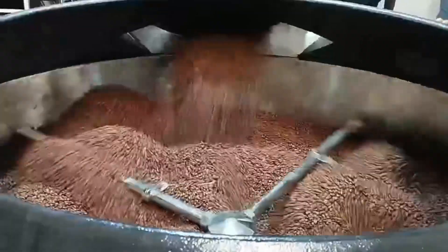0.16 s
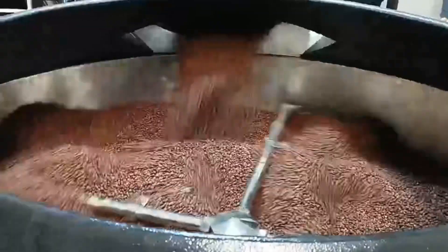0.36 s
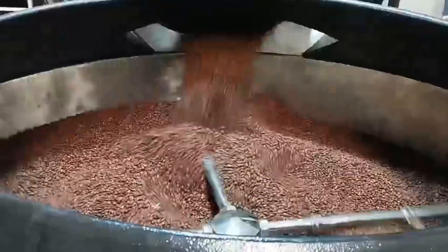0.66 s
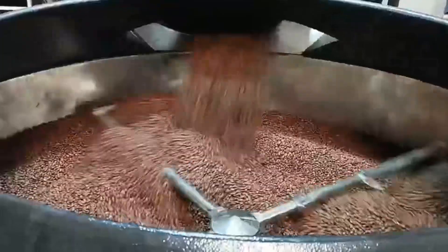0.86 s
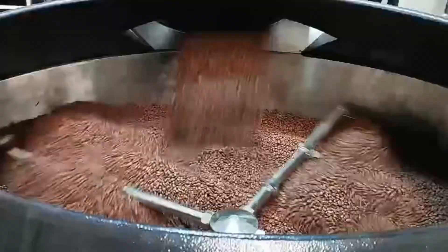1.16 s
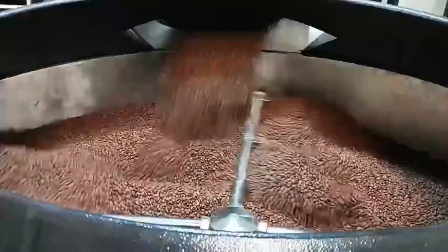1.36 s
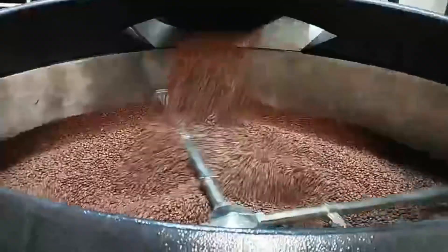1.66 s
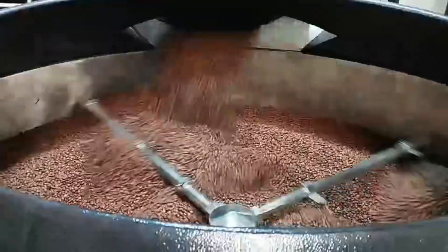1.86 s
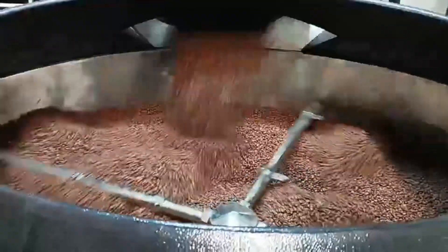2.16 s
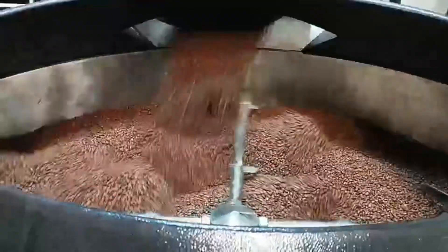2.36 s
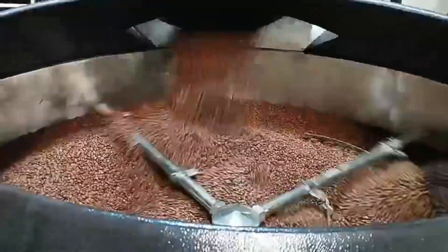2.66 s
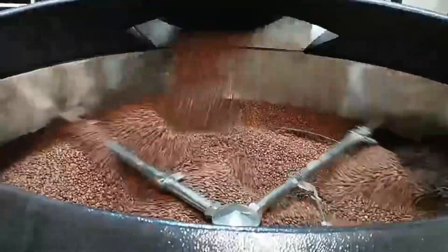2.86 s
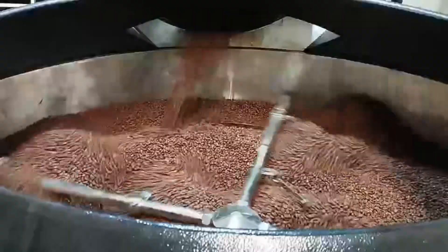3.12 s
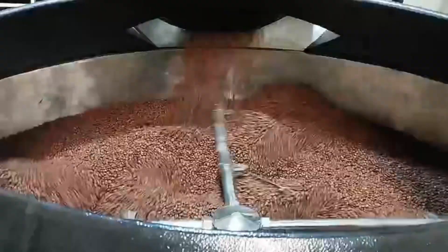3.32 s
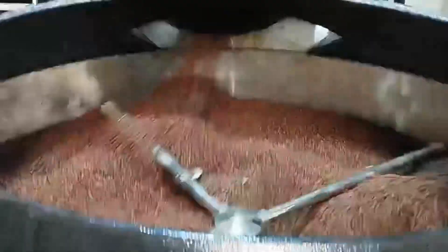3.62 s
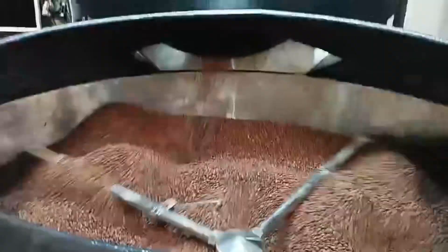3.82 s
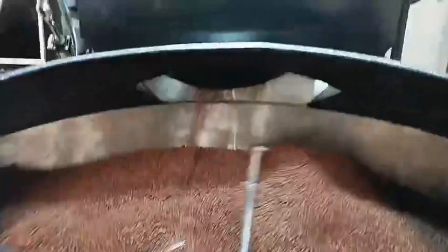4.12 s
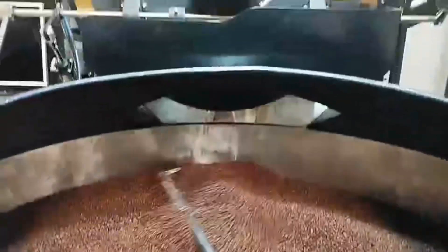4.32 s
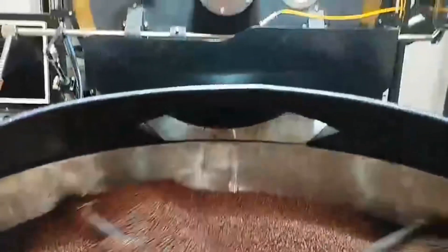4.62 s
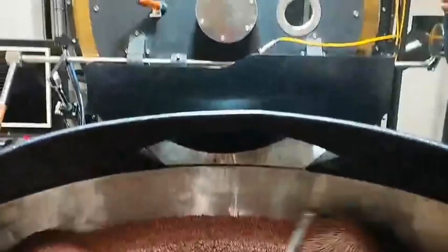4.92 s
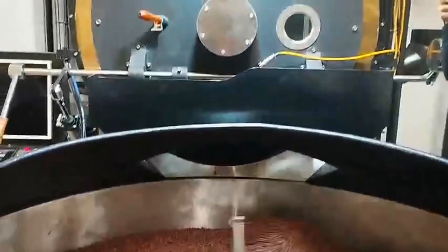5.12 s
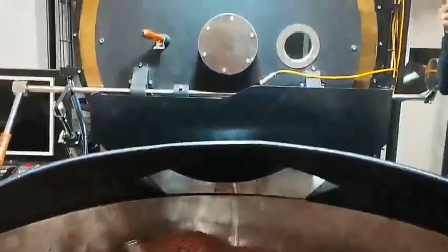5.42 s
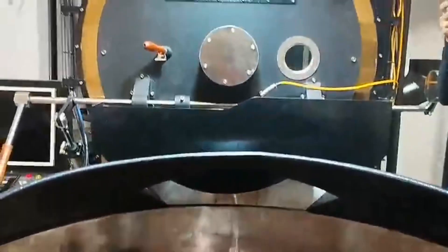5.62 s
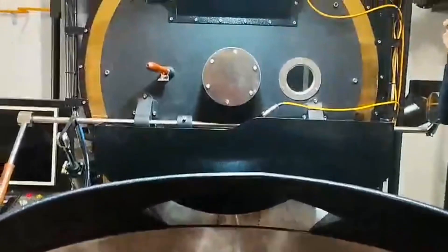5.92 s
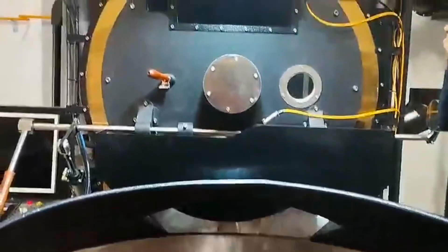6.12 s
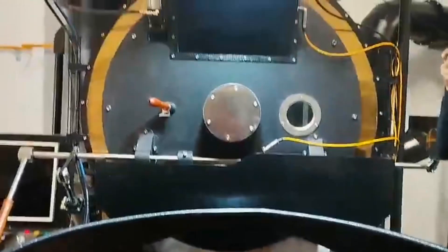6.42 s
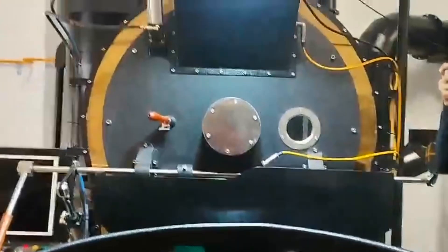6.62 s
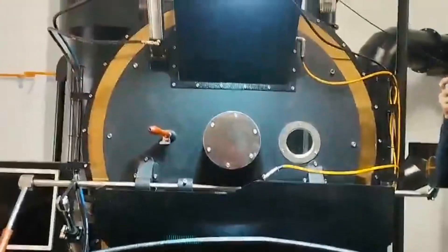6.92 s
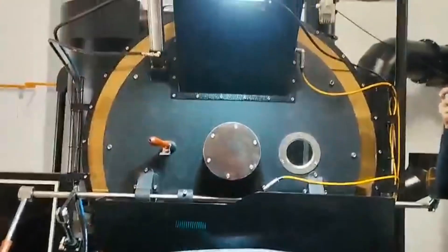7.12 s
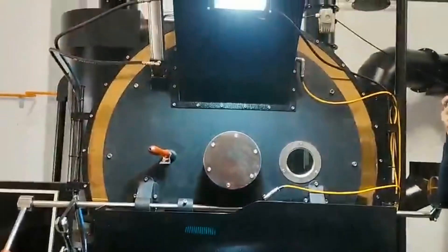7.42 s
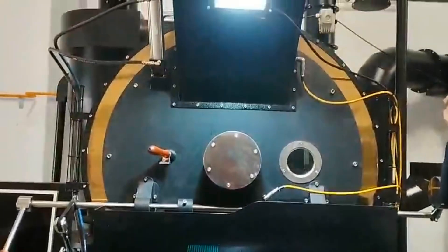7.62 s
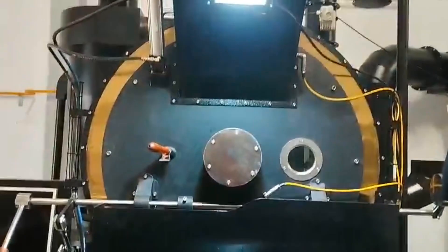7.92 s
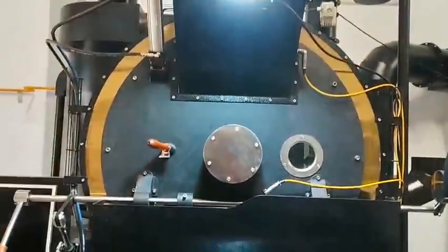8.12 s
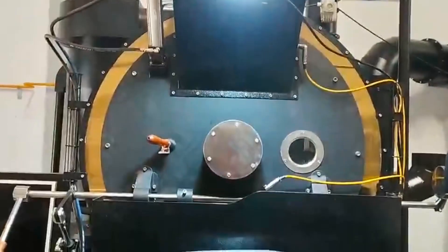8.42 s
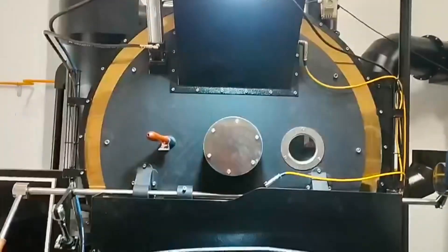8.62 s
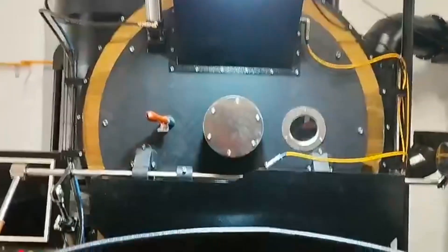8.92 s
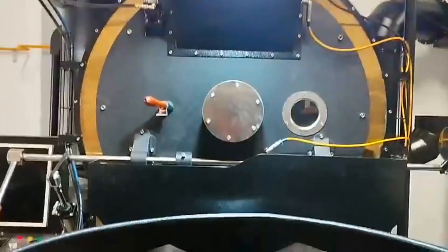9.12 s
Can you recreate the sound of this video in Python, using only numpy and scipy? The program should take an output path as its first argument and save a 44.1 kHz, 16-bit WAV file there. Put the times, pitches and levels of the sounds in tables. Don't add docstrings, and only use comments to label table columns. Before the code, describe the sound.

In a factory hall, a heavy continuous low drone surges and stalls several times a second over rumbling duct air and fan roar. Over it, countless tiny bean knocks merge into a rushing sizzle with few separate ticks, softening after about four seconds. Faint high metallic squeaks flicker around the middle. The handheld stereo phone is close, bass nearly central, treble wider, with automatic level pumping whenever the hum swells.

```python
import sys
import numpy as np
from scipy import signal
from scipy.fft import rfft, irfft
from scipy.io import wavfile
from scipy.ndimage import uniform_filter1d, minimum_filter1d

SR = 44100
rng = np.random.default_rng(int(sys.argv[2]) if len(sys.argv) > 2 else 0)


def attenuation_scalar(level_db):
    decades = np.asarray(level_db, float) / 20
    return 10 ** decades


def to_wav(sig):
    pcm = np.clip(np.atleast_2d(sig), -1, 1) * 32767
    pcm = np.round(pcm).astype(np.int16)
    wavfile.write(sys.argv[1], SR, pcm.T)


N = 408785

T = np.arange(N) / SR
SLOW_T = T[::441]
HZ = np.fft.rfftfreq(1024, 1 / SR)
FRAME_T = np.arange(N // 256 + 5) * 256 / SR


def evened(x):
    return x / np.sqrt(np.mean(x ** 2) + 1e-20)


def read(points, hz, axis=1):
    points = np.array(points)
    return np.interp(np.log(hz + 1), np.log(points[:, 0] + 1), points[:, axis])


def curve(rows, axis, t=T):
    rows = np.array(rows)
    return np.interp(t, rows[:, 0], rows[:, axis])


def bumps(rows):
    total = np.zeros(len(SLOW_T))
    for time_s, height, half_s in rows:
        total += height * np.exp(-((SLOW_T - time_s) / half_s) ** 2)
    return np.interp(T, SLOW_T, total)


def drift(hz):
    return evened(signal.lfilter(*signal.butter(2, hz, fs=SR), rng.standard_normal(N)))


# pitch_hz, likeness (1 = same, 0 = unrelated)
PORT_LIKENESS = [(60, 1.0), (110, 1), (200, 0.93), (380, 0.91), (700, 0.68), (1290, 0.1), (2380, 0.012),
                 (4400, -0.067), (8120, 0.013), (15000, 0.047)]


def pair(hz, shape):
    a, b, c, d = rng.standard_normal((4, *shape))
    left = a + 1j * b
    other = c + 1j * d
    same = np.clip(read(PORT_LIKENESS, hz), -1, 1)
    same = same.reshape(-1, *[1] * (len(shape) - 1))
    return np.array([left, same * left + np.sqrt(1 - same ** 2) * other])


def hiss(field_db, patchy_db, flicker_db):
    patches = rng.standard_normal((len(HZ), len(FRAME_T)))
    patches = uniform_filter1d(patches, size=14, axis=0)
    patches = evened(uniform_filter1d(patches, size=12, axis=1))
    flicker = evened(uniform_filter1d(rng.standard_normal(len(FRAME_T)), size=5))
    level_db = field_db + patchy_db * patches + flicker_db * flicker
    spectra = pair(HZ, patches.shape) * attenuation_scalar(level_db)
    return signal.istft(spectra, nperseg=1024, noverlap=768)[1][:, :N]


def mode(hz, level_db, wander_hz, wander_db, apart):
    phase = 2 * np.pi * np.cumsum(hz + wander_hz * drift(hz=10.05)) / SR
    lag = np.outer([1, -1], apart * drift(hz=1.6))
    return np.sqrt(2) * np.sin(phase + lag) * attenuation_scalar(level_db + wander_db * drift(hz=9.5))


# time_s, rise_db, half_length_s
FLAME_SURGES = [(0.04, 1.5, 0.045), (0.19, 5, 0.026), (0.62, -1.5, 0.042), (1.1, 5.5, 0.04),
                (1.44, 6.5, 0.077), (1.8, 11, 0.057), (2.19, 12, 0.2), (2.73, 12, 0.018), (2.95, 9, 0.039),
                (3.14, 9.5, 0.074), (3.77, 3.5, 0.12), (4.06, 2.0, 0.03), (4.17, 7, 0.15),
                (4.42, 5.5, 0.037), (4.76, 9.5, 0.162), (5.02, 4, 0.033), (5.33, 8, 0.13),
                (5.97, 1.5, 0.05), (6.36, 5.5, 0.105), (7.18, 3.2, 0.029), (7.33, 5, 0.067),
                (7.52, 6, 0.048), (7.71, 8.5, 0.075), (8.15, 6.5, 0.17), (8.68, 7, 0.11), (8.89, 7, 0.026),
                (9.09, 1, 0.033)]
# time_s, change_db, half_length_s
HUM_LULLS = [(0.135, -4, 0.037), (0.455, -14.5, 0.052), (0.917, -10.5, 0.036), (1.19, -1, 0.03),
             (1.634, -6.5, 0.081), (1.968, -8.5, 0.14), (2.24, -19.5, 0.079), (2.632, -14, 0.044),
             (2.83, -9, 0.14), (3.136, -15, 0.041), (3.27, -5.2, 0.03), (3.38, -12, 0.043),
             (3.578, -5.5, 0.044), (3.915, -10.5, 0.044), (4.108, -12.5, 0.042), (4.312, -13.5, 0.028),
             (4.727, -19, 0.074), (5.28, -16.5, 0.071), (5.63, -7.5, 0.047), (6.07, -5, 0.03),
             (6.5, -11.5, 0.062), (6.794, -10.6, 0.063), (7.59, -4, 0.023), (7.918, -7, 0.22),
             (8.454, -3, 0.031), (8.83, -5, 0.034), (8.94, -4.5, 0.043), (9.163, -9, 0.033)]
# time_s, change_db, half_length_s
DRONE_THROBS = [(0.2, 7, 0.028), (0.33, 4, 0.042), (0.54, -2, 0.031), (0.89, 4, 0.34), (1.14, -4, 0.032),
                (1.23, 6.4, 0.039), (1.55, 1.3, 0.031), (1.58, -5, 0.088), (2.82, 2.5, 0.031),
                (3.209, 12.5, 0.026), (3.37, 7, 0.066), (3.82, 11, 0.03), (4.68, -18, 0.09),
                (4.82, 4.8, 0.051), (5.04, 6.5, 0.071), (5.32, -14, 0.03), (5.4, 5.8, 0.05),
                (5.58, 4.5, 0.031), (5.74, -1, 0.024), (5.87, -12, 0.037), (6.12, 7, 0.073),
                (6.45, -14, 0.03), (6.74, 6, 0.028), (7.22, 4, 0.027), (7.43, 9, 0.028), (7.56, 14, 0.039),
                (7.669, -22, 0.091), (7.99, -8, 0.046), (8.88, 3, 0.032), (9.1, 5, 0.036)]


def hum():
    hum_hz, hum_db = 145.9, -13
    drone_hz, drone_db = 321.8, -22.5
    change_db = bumps([*FLAME_SURGES, *HUM_LULLS])
    stall = np.clip(-change_db / 10, 0, 1)
    stray_hz = 2.8 * stall * drift(hz=5.05)
    low = mode(hum_hz + stray_hz, hum_db + change_db, wander_hz=1.82, wander_db=1.47, apart=0.015)
    high = mode(drone_hz, drone_db + bumps(DRONE_THROBS), wander_hz=5.16, wander_db=3.5, apart=0.11)
    low_balance = attenuation_scalar(np.array([[.25], [-.25]]))
    high_balance = attenuation_scalar(np.array([[-.6], [.6]]))
    return low * low_balance + high * high_balance


# pitch_hz, width_hz, level_db
DUCT_MODES = [(32, 7.6, -16), (47, 12.3, -9), (64.4, 9.1, -3.5), (84.4, 13, -11), (125.8, 4.2, -5),
              (135, 14.3, -11), (182.2, 13, -13.5), (196.3, 12.6, -8), (214.4, 12, -12.5), (251, 65, -16.5),
              (303, 11.2, -6), (341.4, 34, -13), (382.7, 10.6, -7.5), (451, 19, -19.5), (503.6, 14, -17),
              (581, 75, -21.5), (662.4, 45, -20), (770, 50, -21), (877, 41, -20.5), (975, 25, -23.5),
              (1073, 28, -21.5), (1515, 18, -27), (1890, 63, -35.5)]
# pitch_hz, left_over_right_db
PORT_LEAN = [(40, 1.5), (110, -0.2), (300, -1), (500, 1), (900, -1.2), (1800, 1.5), (2600, 6.5),
             (5000, -1.5)]


def ducts():
    hz = np.fft.rfftfreq(N, 1 / SR)
    power = np.zeros(len(hz))
    for mode_hz, width_hz, level_db in DUCT_MODES:
        power += attenuation_scalar(2 * level_db) / (1 + (2 * (hz - mode_hz) / width_hz) ** 2) ** 1.57
    lean = attenuation_scalar(np.outer([.5, -.5], read(PORT_LEAN, hz)))
    sound = irfft(pair(hz, hz.shape) * np.sqrt(power) * lean, N)
    return evened(sound) * attenuation_scalar(-15.5)


# pitch_hz, level_db (per Hz)
ROAR_COLOUR = [(20, -14), (100, 2), (400, -6), (700, -9), (1200, -9.5), (1900, -13), (2350, -18.5),
               (2700, -23.5), (5000, -27.5), (9000, -37)]


def roar():
    colour_db = read(ROAR_COLOUR, HZ) + np.outer([.5, -.5], read(PORT_LEAN, HZ))
    sound = hiss(colour_db[:, :, None], patchy_db=0.9, flicker_db=0.0)
    return evened(sound) * attenuation_scalar(-21.0)


def hall(x):
    hz = np.fft.rfftfreq(N, 1 / SR)
    smooth = uniform_filter1d(rng.standard_normal((3, len(hz))), size=70)
    shared, *own = uniform_filter1d(smooth, size=70)
    ripple = evened(shared + 0.35 * np.array(own))
    depth_db = np.interp(hz, [380, 450, 1500, 3500], [0, 1.3, 1., 0])
    return irfft(rfft(x) * attenuation_scalar(depth_db * ripple), N)


# pitch_hz, left_db, right_db
BEAN_COLOUR = [(1000, -5, -9), (2500, 0, -5), (3550, -4, -0.1), (4560, -0.5, 4), (6100, 0.5, -1.5),
               (7500, -6.5, -4.5), (8300, -13, -13), (8550, -12.5, -12.5), (9000, -8, -10.5),
               (10000, -7, -16.5), (10940, -10.5, -32), (12130, -3, -22), (13200, -1, -11),
               (15700, -3.5, -10)]
# time_s, rush_db, sizzle_db (both over the roar)
BEAN_POUR = [(0, -9, -17.5), (.8, -10.5, -17.5), (1.6, -9.5, -16.5), (2.0, -11, -18.5), (2.6, -10.5, -16),
             (3.1, -12, -17.5), (3.65, -11.5, -17), (4.0, -13.5, -20), (4.65, -12, -16.5), (5.1, -15, -21),
             (5.5, -15, -21.5), (5.9, -15.5, -20), (6.4, -16.5, -21), (7.0, -18, -21.5), (7.7, -16, -18.5),
             (8.4, -16.5, -18), (8.9, -18.5, -22), (9.27, -16, -23)]


def beans():
    colour_db = np.array([read(BEAN_COLOUR, HZ, axis=1), read(BEAN_COLOUR, HZ, axis=2)])
    high = np.clip((HZ[:, None] - 7000) / 5000, 0, 1)
    rush_db = curve(BEAN_POUR, 1, FRAME_T)
    paddles_db = 0.7 * np.interp(FRAME_T, T, drift(hz=5.9))
    sizzle_db = curve(BEAN_POUR, 2, FRAME_T) + paddles_db
    level_db = -41 + (1 - high) * rush_db + high * (sizzle_db + 7)
    sound = hiss(colour_db[:, :, None] + level_db, patchy_db=0.6, flicker_db=0.33)
    tick_now = rng.random((2, N)) < 150 / SR
    ticks = tick_now * rng.exponential(1, (2, N))
    knock = np.exp(-np.arange(300) / SR / 0.0011)
    return sound * (1 + 0.23 * signal.oaconvolve(ticks, knock[None])[:, :N])


def tones(rows, level_db, wander_hz, flicker_db):
    out = np.zeros((2, N))
    for hz, *ports_db in rows:
        phase = 2 * np.pi * np.cumsum(hz + wander_hz * drift(hz=6.6)) / SR
        line = np.sin(phase) * attenuation_scalar(level_db + flicker_db * drift(hz=9.8))
        out += attenuation_scalar(np.array(ports_db))[:, None] * line
    return out


# pitch_hz, left_db, right_db
GEAR_TONES = [(486, -30.5, -32.5), (1365, -46, -42.5)]


def gears():
    tilt_db = np.interp(T, [0, 4.8, 6.5], [1.5, 1.5, -5.])
    return tones(GEAR_TONES, tilt_db, wander_hz=1.04, flicker_db=3.5)


# pitch_hz, left_db, right_db
BEARING_TONES = [(2660, -1, -3), (3946, -2, -2.5), (4463, -4, -6), (5637, 0, -1), (7704, -9, -12),
                 (10126, -9, -25), (12893, 7, -12), (13050, 1, -16), (13255, 1.5, -16)]
# time_s, peak_db, half_length_s
BEARING_SQUEALS = [(3.65, -54, .2), (4.05, -54, .18), (4.42, -52, .06), (4.63, -48, .1), (4.8, -57, .25),
                   (4.95, -53, .05), (5.29, -51, .04), (5.55, -57, .06), (5.66, -53, .025),
                   (5.82, -49, .07), (5.96, -53, .03), (6.15, -59, .1), (6.71, -53, .05), (7.4, -59, .04),
                   (7.78, -50, .04), (7.93, -58, .04)]


def bearing():
    squeal = bumps([(time_s, attenuation_scalar(peak_db), half_s) for time_s, peak_db, half_s in BEARING_SQUEALS])
    return squeal * tones(BEARING_TONES, 3.0, wander_hz=3., flicker_db=2.0)


def scene():
    air = hum() + hall(ducts() + roar())
    return air + beans() + gears() + bearing()


# time_s, push_db, half_length_s
PRESSURE_PUFFS = [
    (.33, 1.5, 0.074),
    (1.85, 1.5, 0.033),
    (3.78, 0, 0.067),
    (4.28, 1.5, .04),
    (5.06, 2, 0.052),
    (5.45, 0, .06),
    (6.38, 2.5, 0.042),
    (8.55, 1, 0.1),
]


def levelled(x):
    grab_s, let_go_s = 0.034, 0.11
    squeeze, knee_db = 0.73, -10.5
    power = uniform_filter1d((x ** 2).mean(0), size=900)[::441]
    loud_db = 10 * np.log10(abs(power) + 1e-9)
    held_db, held = knee_db, []
    for now_db in loud_db:
        react_s = grab_s if now_db > held_db else let_go_s
        held_db += (now_db - held_db) * (1 - np.exp(-441 / SR / react_s))
        held.append(held_db)
    over_db = np.interp(T, SLOW_T, held) - knee_db - 1.2
    return x * attenuation_scalar(-squeeze * over_db - bumps(PRESSURE_PUFFS))


# pitch_hz, share_db
TREBLE_DROP = [(6500, -20), (7600, -7), (8150, 2), (8600, 2), (9500, -9), (11000, -6), (12500, -9),
               (13500, -20)]


def thinned(x):
    first = 425
    hz, t, z = signal.stft(x[:, first:], SR, "cosine", nperseg=2048, noverlap=1024)
    treble_band = (hz > 9200) & (hz < 10200)
    treble = np.sqrt(np.mean(abs(z[0, treble_band]) ** 2, axis=0))
    margin_db = 6 * evened(uniform_filter1d(rng.standard_normal((65, len(t))), size=3))
    margin_db = np.repeat(margin_db, 16, axis=0)[:len(hz)]
    share = attenuation_scalar(read(TREBLE_DROP, hz)[:, None] + margin_db)
    edge = uniform_filter1d(treble, size=5) * share * (hz > 6500)[:, None]
    kept = signal.istft(z * (abs(z) > edge), SR, "cosine", nperseg=2048, noverlap=1024)[1]
    return np.hstack([x[:, :first], kept])[:, :N]


def low_pass(x):
    return signal.sosfilt(signal.butter(12, 15760, fs=SR, output="sos"), x)


def record(dry):
    even = levelled(dry)
    crest = -minimum_filter1d(-abs(even).max(0), size=500)
    limit = np.minimum(1, .84 / crest) ** .65
    held = even * uniform_filter1d(limit, size=400)
    mix = thinned(held)
    return low_pass(mix)


dry = scene()
out = record(dry)
to_wav(out)
```